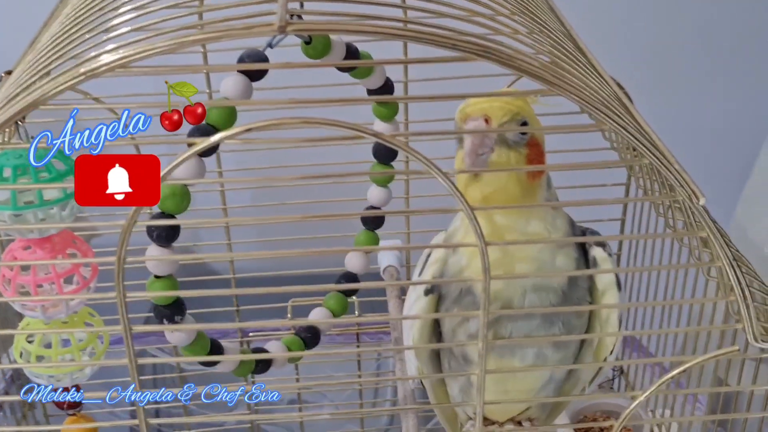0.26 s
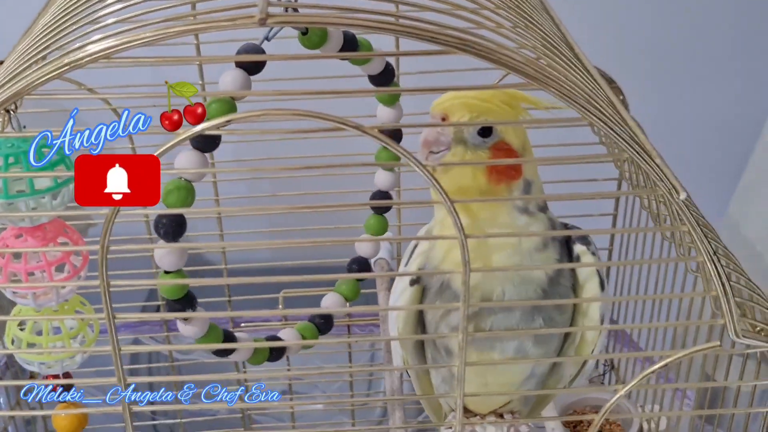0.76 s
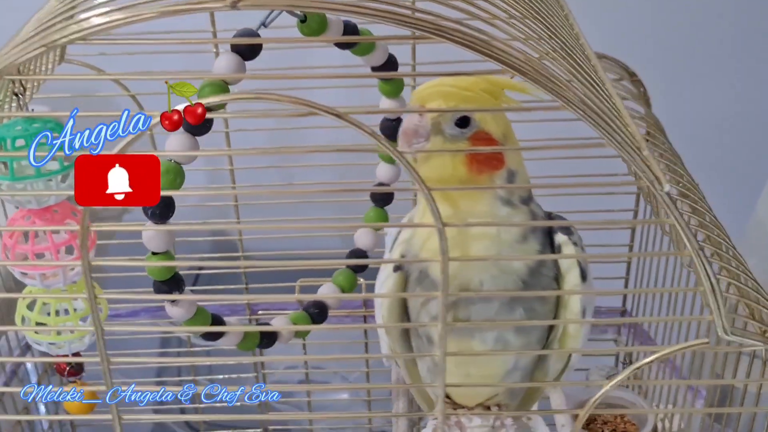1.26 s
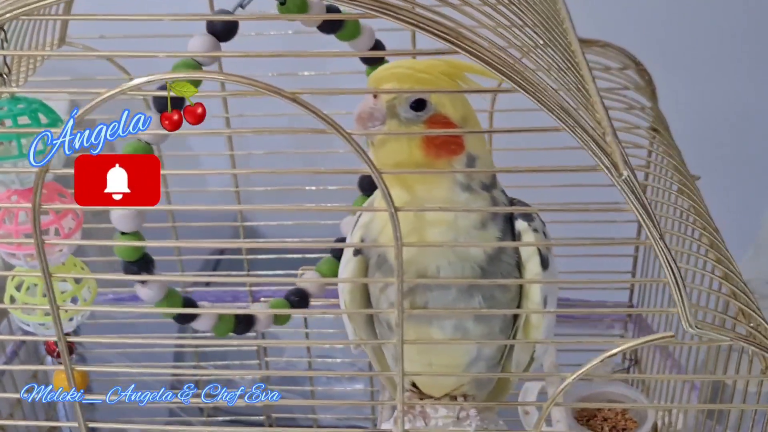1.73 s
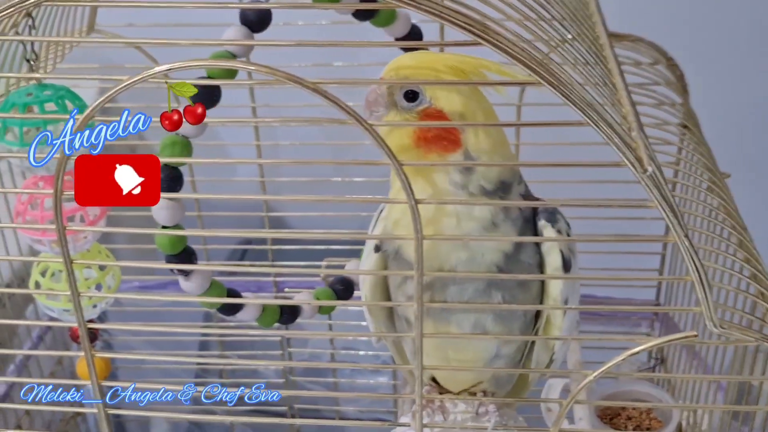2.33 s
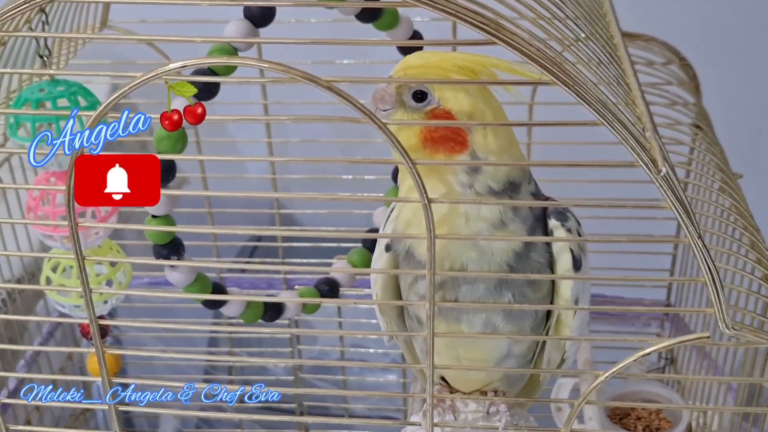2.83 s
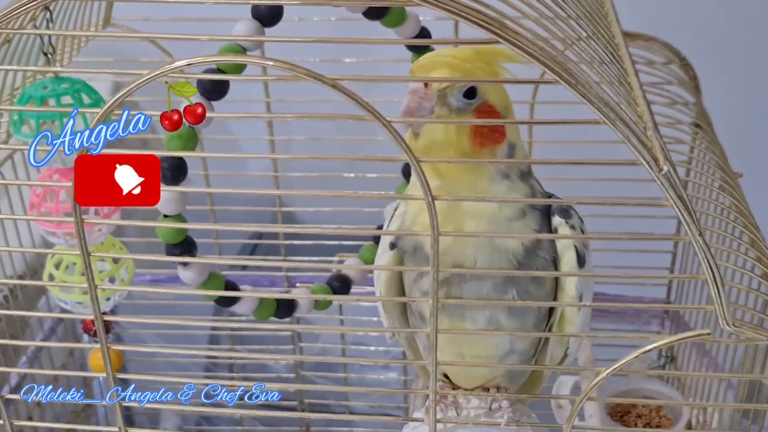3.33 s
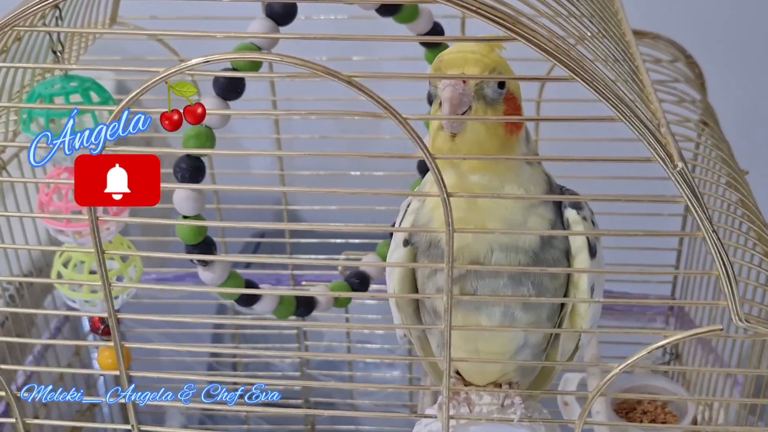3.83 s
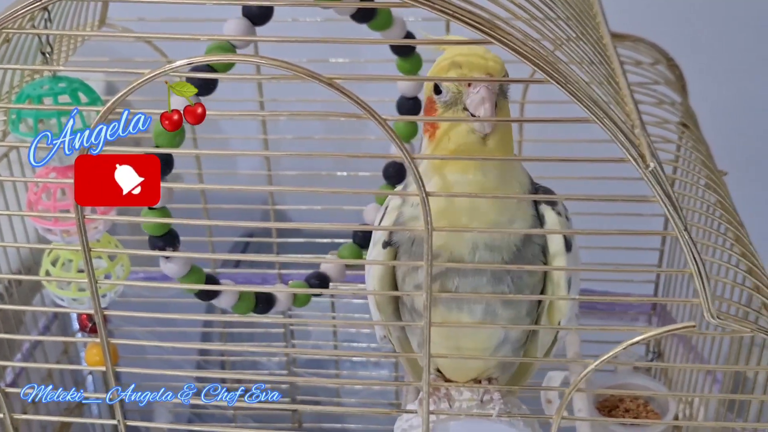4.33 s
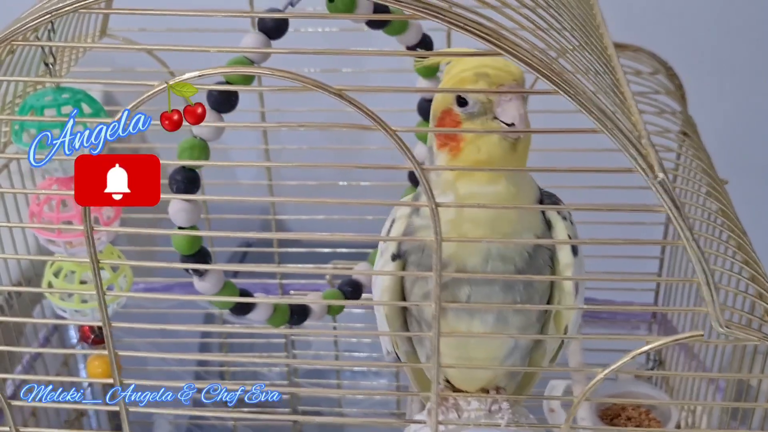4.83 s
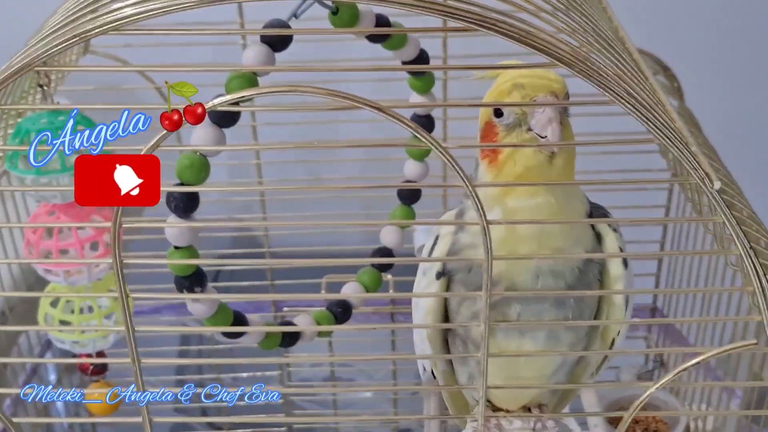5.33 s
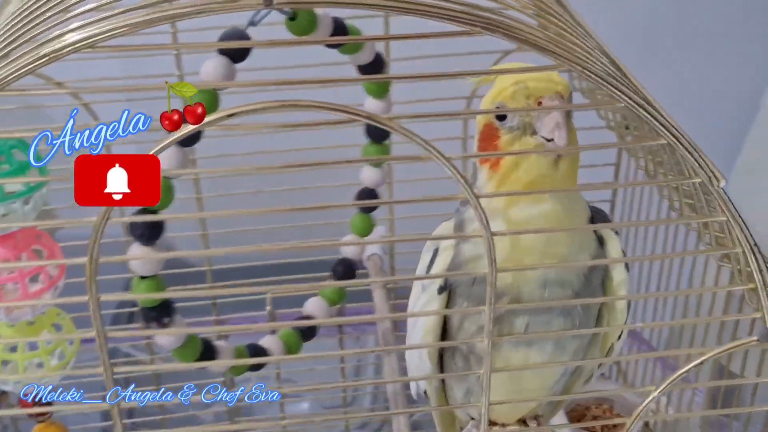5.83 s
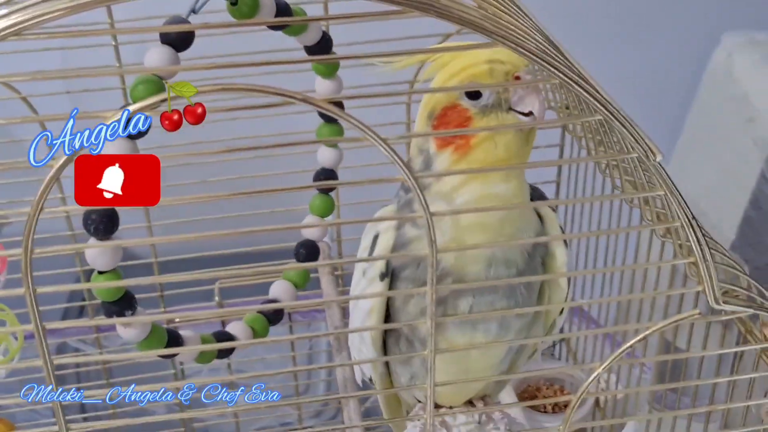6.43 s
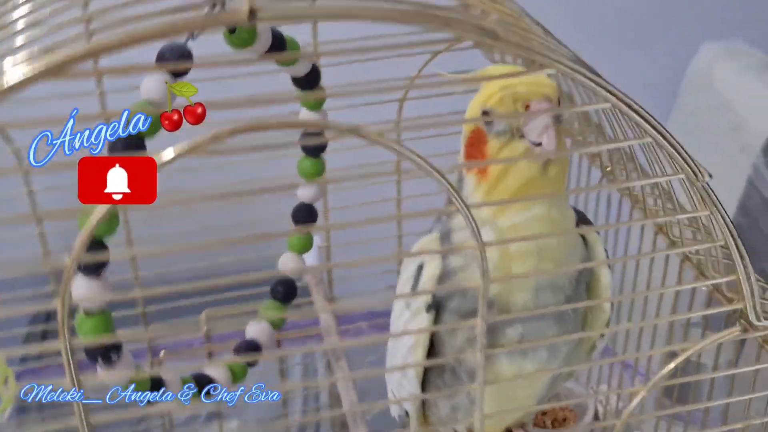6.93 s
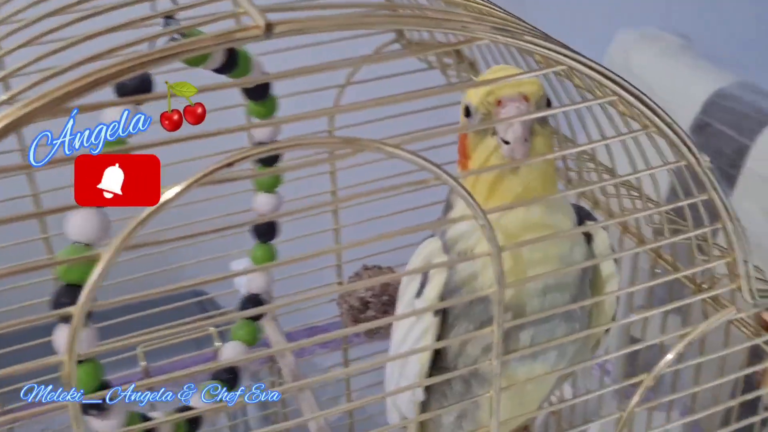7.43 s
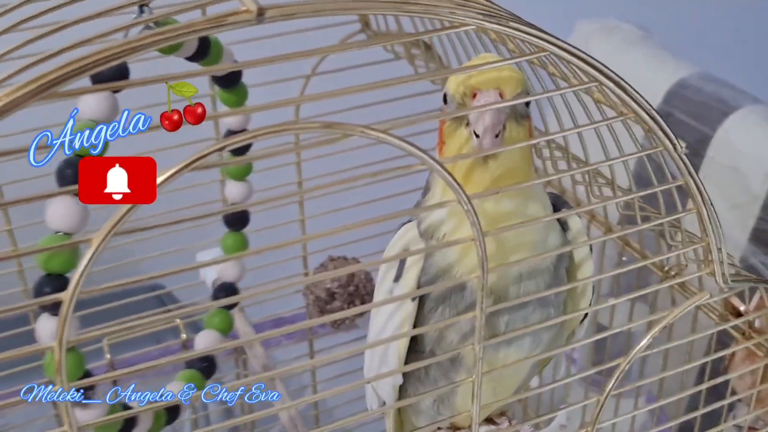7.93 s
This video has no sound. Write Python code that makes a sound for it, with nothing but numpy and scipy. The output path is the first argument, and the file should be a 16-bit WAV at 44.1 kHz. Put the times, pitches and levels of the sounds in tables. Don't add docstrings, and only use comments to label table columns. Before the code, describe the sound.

Buzzy-edged rising bird whistles, uneven at first then steadily repeating long-short, ring off bare walls over low ventilation rumble and soft hiss.

```python
import sys
import numpy as np
from scipy import signal
from scipy.fft import rfft, irfft
from scipy.io import wavfile
from scipy.ndimage import uniform_filter1d, map_coordinates

SR = 44100
rng = np.random.default_rng(int(sys.argv[2]) if len(sys.argv) > 2 else 0)


def nominal_scale(level):
    x = np.asarray(level, float) / 20
    return 10 ** x


def master(y):
    cut = np.clip(np.atleast_2d(y).T, -1, 1)
    pcm = np.round(cut * 32767)
    wavfile.write(sys.argv[1], SR, pcm.astype(np.int16))


N = 361179
TOP_HZ = 15800


def rms_one(x):
    return x / np.sqrt(np.mean(x ** 2) + 1e-20)


def in_time(rows, t):
    s, *columns = np.transpose(rows)
    return [np.interp(t, s, c) for c in columns]


def at_hz(points, hz):
    point_hz, value = np.array(points).T
    return np.interp(np.log(np.maximum(hz, 1)), np.log(point_hz), value)


def drift(rate_hz, size):
    r = np.exp(-2 * np.pi * rate_hz / SR)
    settle = 4000
    return rms_one(signal.lfilter([1], [1, -2 * r, r * r], rng.standard_normal(size + settle))[settle:])


def noise(colour, likeness=((1, 1), (2, 1)), size=N):
    hz = np.fft.rfftfreq(size, 1 / SR)
    mid, side = rfft(rng.standard_normal((2, size)))
    alike = np.clip(at_hz(likeness, hz), -1, 1)
    gain = nominal_scale(at_hz(colour, hz)) * (hz > colour[0][0]) * (hz < colour[-1][0])
    pair = np.sqrt(1 + alike) * mid + np.sqrt(1 - alike) * side * [[1], [-1]]
    return rms_one(irfft(gain * pair, size))


# pitch_hz, level_db, t60_s
EARLIER_ECHO = (2920, -59, 0.3)


def earlier_echo():
    pitch_hz, level_db, t60_s = EARLIER_ECHO
    t = np.arange(N) / SR
    return nominal_scale(level_db - 60 * t / t60_s + 8.85 * drift(31, N)) * np.sin(2 * np.pi * pitch_hz * t)


def gate(voice):
    threshold_db, rise_s, fall_db_per_s = -48, .04, 50.5
    t = np.arange(N) / SR
    level_db = 10 * np.log10(np.maximum(uniform_filter1d(voice ** 2, size=800), 1e-9))
    fallen_db = fall_db_per_s * t
    held_db = np.maximum.accumulate(np.maximum(level_db - threshold_db, 0) + fallen_db) - fallen_db
    r = np.exp(-1 / (rise_s * SR))
    return signal.lfilter([1 - r], [1, -r], held_db)


# time_s, level_db
VENT = [(0, 2), (.7, -1), (1.0, 1), (1.9, 3), (2.6, -3), (3.4, 0.43), (5.0, 0.32), (8.2, 0.9)]
# freq_hz, density_db_per_hz
RUMBLE = [(20, -12), (33, -13), (60, -10.5), (97, -16.5), (135, -6), (170, -10.5), (205, 2), (244, -7),
          (280, -2.5), (325, -7.5), (406, -4.5), (604, -12.5), (800, -11), (1400, -29)]
# freq_hz, level_db
HUM = (270, -70.5)
# freq_hz, density_db_per_hz
HISS = [(700, -20.5), (1000, -7), (1400, -5), (2260, -5.5), (4410, -7.5), (7000, -9), (11600, -5.5),
        (14000, -9), (16200, -4.5)]
# freq_hz, left_right_likeness
FLOOR_LIKENESS = [(60, 0.78), (180, 1), (550, 0.3), (1650, -0.13), (4970, -0.038), (15000, -0.29)]


def background(voice):
    vent_db, open_db = in_time(VENT, np.arange(N) / SR)[0], gate(voice)
    rumble_db = -61 + vent_db + 0.154 * open_db
    hiss_db = -63 + vent_db + .18 * open_db
    rumble = nominal_scale(rumble_db + 2.0 + 1.5 * drift(5.3, N)) * noise(RUMBLE, FLOOR_LIKENESS)
    hum_hz, hum_db = HUM
    hum_level = nominal_scale(hum_db + 4.3 * drift(2.5, N))
    hum = hum_level * np.sin(2 * np.pi * np.cumsum(hum_hz + 1.515 * drift(5.3, N)) / SR)
    hiss = nominal_scale(hiss_db + 4.5 + .5 * drift(8.9, N)) * noise(HISS, FLOOR_LIKENESS)
    return rumble + hum + hiss


def lead_in(sound):
    size = round(.022 * SR)
    return nominal_scale(-42 + 12.0 * np.linspace(-1, 1, size)) * drift(140, size) * sound[size // 2:][:size]


# multiple, level_db
BUZZ_ORDERS = [(2, 2.5), (3, -13.5), (4, -19), (5, -37), (6, -33), (7, -50.5), (8, -26), (9, -39.5),
               (10, -26)]
STRAIN_DB = [-21, -29, -21]
# freq_hz, level_db
SHINE = [(3000, -7), (4500, -18), (7000, -25), (9000, -11.5), (10300, -7), (12000, -1), (13500, -13),
         (15500, -16)]


def note(rows, slips, hoarse, breath):
    waver, flutter_db, scoop, slip_s = 0.0043, 1.0322, 0.062, .0045
    start_s, stop_s = 0.0028, 0.0086
    rows = np.array(rows)
    t = np.arange(round(rows[0, 0] * SR), round(rows[-1, 0] * SR)) / SR
    size, since_s = len(t), t - t[0]
    pitch_hz, _, _, shine_db = in_time(rows, t)
    whistle_db, buzz_db = [20 * np.log10(np.interp(t, rows[:, 0], nominal_scale(rows[:, c]))) for c in (2, 3)]

    sag = scoop * np.exp(-since_s / 0.003)
    slip_db = 0
    for s, share, loss_db in slips:
        dip = np.exp(-((t - s) / np.where(t < s, slip_s, slip_s / 2)) ** 2 / 2)
        sag = sag + share * dip
        slip_db = slip_db + loss_db * dip
    jitter = np.full(size, waver)
    for start, stop, share, change_db in hoarse:
        inside = np.clip(np.minimum(t - start, stop - t) / 0.0038, 0, 1)
        jitter = jitter + share * inside
        buzz_db = buzz_db + change_db * inside
    pitch_hz = uniform_filter1d(pitch_hz, size=300, mode="nearest") * (1 - sag + jitter * drift(79, size))
    phase = 2 * np.pi * np.cumsum(pitch_hz) / SR

    tone = nominal_scale(whistle_db - slip_db - 25 * scoop * np.exp(-since_s / .004)) * np.sin(phase)
    clear = np.clip((whistle_db - buzz_db) / 10, 0, 1)
    buzz_db = buzz_db - slip_db + 6 * clear * drift(70, size)
    softness_db = np.maximum(-40 - buzz_db, 0)
    for k, order_db in BUZZ_ORDERS:
        order_db = order_db - 60 * k * jitter - .4 * (k - 2) * softness_db
        tone += nominal_scale(buzz_db + order_db) * np.sin(round(k) * phase) * (k * pitch_hz < TOP_HZ)
    for k, strain_db in enumerate(STRAIN_DB, start=3):
        tone += nominal_scale(2 * whistle_db + strain_db - 11) * np.sin(k * phase) * (k * pitch_hz < TOP_HZ)
    shine = nominal_scale(shine_db - 2.0 * slip_db) * clear
    for k in range(3, 11):
        beak = nominal_scale(at_hz(SHINE, k * pitch_hz) - 3.0 + 4.5 * drift(25, size))
        tone += shine * beak * np.cos(k * phase) * (k * pitch_hz < TOP_HZ)

    tone = np.sqrt(2) * tone * nominal_scale((flutter_db + 60 * jitter) * drift(43, size))
    tone = tone * (1 + 28 * np.maximum(jitter - .011, 0) * drift(250, size))
    edges = np.clip(np.minimum(since_s / start_s, (t[-1] - t) / stop_s), 0, 1)
    breath_db = -15 + 200 * np.minimum(jitter, .03)
    return edges * (tone + shine * nominal_scale(breath_db) * breath[:size])


def sung(shape, row, opening_end, slips, hoarse):
    start_s, opening_s, glide_s, pitch_hz, change_db = row
    shape = np.array(shape, float)
    hold, end = shape[opening_end, 0], shape[-1, 0]

    def clock(u):
        gliding = opening_s + (u - hold) * glide_s / (end - hold)
        return start_s + np.where(u < hold, u * opening_s / hold, gliding)

    to_go = np.clip((end - shape[:, 0]) / (end - hold), 0, 1)
    tuned_hz = shape[:, 1] * (pitch_hz / shape[1, 1]) ** to_go
    levels_db = shape[:, 2:] + change_db * np.array([1, 1, 2])
    rows = np.column_stack([clock(shape[:, 0]), tuned_hz, levels_db])
    slips = [(clock(u) + .002 * rng.standard_normal(), share * rng.uniform(.7, 1.3), loss_db)
             for u, share, loss_db in slips]
    return rows, slips, [(clock(a), clock(b), *rest) for a, b, *rest in hoarse]


def sing(voice, breath, shape, notes, opening_end, slips, hoarse):
    for row in notes:
        i = round(row[0] * SR)
        sound = note(*sung(shape, row, opening_end, slips, hoarse), breath[i:])
        voice[i:i + len(sound)] += sound
        lead = lead_in(sound)
        voice[i - len(lead):i] += lead


# into_note_s, pitch_loss_share, loss_db
WARBLE_SHAPE = [(0, 1202, -38.5, -52, -62), (.054, 1200, -36, -59, -54), (.066, 1554, -31.5, -50.5, -52),
                (.089, 1851, -31, -58.5, -36.5), (.114, 2038, -29, -47.5, -38),
                (.137, 2200, -37.5, -58.5, -37.5), (.151, 2830, -39, -80, -52.5)]
WARBLE_NOTES = [
    (.146, .054, .097, 1206, -1),
    (2.818, .044, .104, 1216, -3),
]
WARBLE_SLIPS = [(0.054, .04, 2.1), (0.079, .22, 6.3), (.104, .22, 6.5), (.127, .12, 5.6)]


def warbles(voice, breath):
    sing(voice, breath, WARBLE_SHAPE, WARBLE_NOTES, 1, WARBLE_SLIPS, [(.039, .159, .011, -10)])


FALL_SHAPE = [(0, 2030, -39, -60.5, -60.5), (.015, 1955, -33.5, -61, -40),
              (.027, 1460, -37.5, -63.5, -55.5), (.042, 1215, -39.5, -59, -59),
              (.057, 1187, -33, -73.5, -70)]
FALL_NOTES = [
    (.34, .015, 0.032, 1972, 0.42),
    (3.005, .015, .04, 1991, -1.5),
]


def falls(voice, breath):
    sing(voice, breath, FALL_SHAPE, FALL_NOTES, 1, [], [(-.01, .065, .012, -10)])


LONG_SHAPE = [(0, 1392, -41.5, -33, -58), (.016, 1485, -32.5, -22.5, -56), (.064, 1451, -32, -30, -56),
              (.08, 1552, -31, -50, -52), (.107, 1778, -28.5, -56, -44.5), (.162, 2150, -29, -57.5, -46),
              (.203, 2671, -16.5, -49.5, -48.5), (.238, 3301, -19, -59, -62), (.274, 3936, -28, -54.5, -59)]
LONG_NOTES = [
    (0.667, 0.07913, 0.1868, 1467, -3),
    (3.323, 0.08167, .192, 1483, -1),
    (4.366, 0.0811, 0.1875, 1490, 1),
    (5.43, 0.08167, 0.19145, 1497, 0.68),
    (6.462, .078, .197, 1491, 0.34),
    (7.506, 0.08196, 0.1985, 1475, 0.53),
]
LONG_SLIPS = [(0.087, .04, 4), (0.114, 0.021, 2.5), (0.139, .03, -1), (.16, .03, 2.5), (.179, .035, 8.5),
              (.199, 0.038, 13.5)]


def long_whistles(voice, breath):
    sing(voice, breath, LONG_SHAPE, LONG_NOTES, 3, LONG_SLIPS, [])


SCREAM_SHAPE = [(0, 1467, -34.5, -26.5, -60), (.018, 1589, -32.5, -28.5, -50),
                (.073, 1541, -34.5, -21.5, -59), (.108, 1906, -32.5, -21, -53.5),
                (.141, 2392, -20.5, -35, -58), (.157, 2968, -16, -45.5, -66.5),
                (.225, 2960, -10.5, -55, -64.5), (.245, 2880, -27.5, -49, -63.5),
                (.295, 1380, -39.5, -50, -60.5)]
SCREAM_NOTES = [
    (1.977, .073, .222, 1591, 0.13),
]
SCREAM_SLIPS = [(0.088, 0.044, 4), (.113, 0.036, 3), (.13, .03, 3), (.234, .005, 15)]


def scream(voice, breath):
    hoarse = [(.073, .145, .02, -1), (.247, .308, .032, -15)]
    sing(voice, breath, SCREAM_SHAPE, SCREAM_NOTES, 2, SCREAM_SLIPS, hoarse)


# time_s, level_db
RASP = [(2.04, -72.5), (2.055, -28.5), (2.09, -34.5), (2.12, -38.5), (2.15, -50), (2.21, -52),
        (2.235, -45.5), (2.27, -52.5), (2.285, -69)]
# freq_hz, density_db_per_hz
RASP_COLOUR = [(2650, -35.5), (4500, 3.5), (5200, -6.5), (7710, -5.5), (12100, -21), (14200, -40),
               (15500, -18.5)]


def rasp():
    t = np.arange(N) / SR
    level = nominal_scale(in_time(RASP, t)[0]) * (t > RASP[0][0]) * (t < RASP[-1][0])
    return level * noise(RASP_COLOUR)[0] * nominal_scale(2.5 * drift(150, N))


SHORT_SHAPE = [(0, 1355, -42.5, -35, -61), (.017, 1416, -35, -22.5, -52), (.068, 1359, -40.5, -43, -55),
               (.088, 1526, -26.5, -47.5, -40.5), (.11, 1818, -27, -53.5, -38.5),
               (.132, 1990, -28, -47.5, -42), (.158, 2068, -34.5, -62.5, -53)]
SHORT_NOTES = [
    (3.885, 0.0921, .07, 1402, -1.3),
    (4.934, 0.0923, .066, 1418, -0.36),
    (6.008, .085, .07, 1408, 0.167),
    (7.055, 0.0939, 0.065, 1421, 0.287),
    (8.07, 0.0981, .07, 1410, 0.21),
]
SHORT_SLIPS = [(0.076, 0.035, 3.1), (.097, .13, 5.3), (.118, .13, 4), (0.138, 0.068, 5)]


def short_whistles(voice, breath):
    sing(voice, breath, SHORT_SHAPE, SHORT_NOTES, 3, SHORT_SLIPS, [(.09, .165, .006, -4)])


def bird():
    voice, breath = np.zeros(N + SR), np.tile(noise(SHINE)[0], 2)
    for kind in (warbles, falls, long_whistles, scream, short_whistles):
        kind(voice, breath)
    return voice[:N] + rasp()


# freq_hz, density_db_per_hz
ROOM_COLOUR = [(300, -8), (1500, 0), (3000, -2.22), (4500, -1.78), (7000, 1.5), (12000, 3.5), (20000, -7.5)]
# freq_hz, t60_s
ROOM_T60 = [(1000, 0.27), (2000, 0.4004), (3000, 0.29), (5000, 0.31), (10000, 0.15)]
# freq_hz, left_right_likeness
ROOM_LIKENESS = [(1000, .6), (2000, 0.32), (4000, 0.038), (10000, 0.02)]


def room(x):
    room_db, first_echo_s = -4.5, 0.00432
    size = SR // 2 + 4000
    t, hz = np.arange(size) / SR, np.fft.rfftfreq(size, 1 / SR)
    dense = rfft(noise(ROOM_COLOUR, ROOM_LIKENESS, size))
    echoes = 0
    for centre_hz in 500 * 2. ** np.arange(6):
        share = np.clip(1 - np.abs(np.log2(np.maximum(hz, 1) / centre_hz)), 0, 1)
        t60_s = at_hz(ROOM_T60, centre_hz)
        decay = nominal_scale(-60 * t / t60_s) / np.sqrt(t60_s * SR / np.log(1e6))
        echoes = echoes + irfft(share * dense, size) * decay
    echoes = echoes * np.clip(t / first_echo_s - 1, 0, 1)
    return nominal_scale(room_db) * signal.fftconvolve(x[None], echoes, axes=1)[:, :N]


# start_s, level_db, dying_s
RUSTLES = [
    (1.254, -50, 0.036),
    (1.305, -51, 0.086),
    (1.399, -56.5, 0.043),
    (4.083, -43.5, 0.072),
    (7.85, -42, 0.078),
]
# freq_hz, density_db_per_hz
RUSTLE_COLOUR = [(1500, -1), (4000, 1), (8000, 0.5), (12000, 1.5), (15500, -1)]


def rustles():
    t, swell = np.arange(N) / SR, np.zeros(N)
    for start_s, level_db, dying_s in RUSTLES:
        after_s = np.maximum(t - start_s, 0)
        swell += nominal_scale(level_db - 60 * after_s / dying_s / 3) * np.minimum(after_s / 0.00233, 1)
    return swell * nominal_scale(1.35 * drift(200, N)) * noise(RUSTLE_COLOUR, ROOM_LIKENESS)


# time_s, left_right_db, left_lag_samples
PLACE = [(0, 0.7, -1), (1, 1, -3), (2, 3.5, -3), (3, 1, -2.5), (4, 0.5, -4.5), (5, 0, -1.5), (6, 0.5, 2.59),
         (7, 0.7, -1.39), (8.2, 2, -2)]


def scene():
    voice, n = bird(), np.arange(N)
    pan_db, lag = in_time(PLACE, n / SR)
    direct = [nominal_scale(side * pan_db / 2) * map_coordinates(voice, [n - side * lag / 2], order=3)
              for side in (1, -1)]
    heard = nominal_scale(3.0) * (np.array(direct) + room(voice))
    return heard + rustles() + earlier_echo() + background(voice)


def roll_off(x):
    return signal.sosfilt(signal.butter(12, 15760, fs=SR, output="sos"), x)


def record(dry):
    ceiling = .8
    held = dry / (1 + (dry / ceiling) ** 6) ** (1 / 6)
    low_pass = signal.cheby2(18, 60, TOP_HZ + 40, fs=SR, output="sos")
    return roll_off(signal.sosfilt(low_pass, held))


dry = scene()
out = record(dry)
master(out)
```